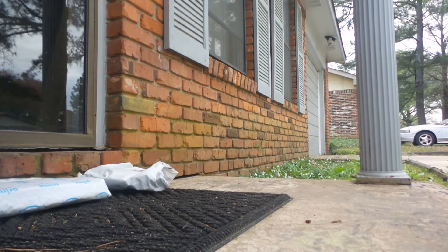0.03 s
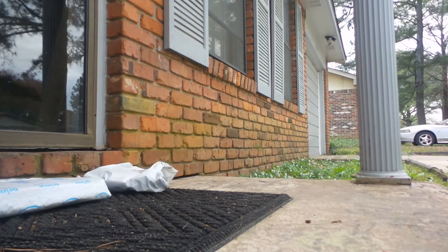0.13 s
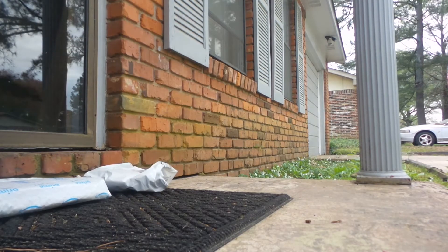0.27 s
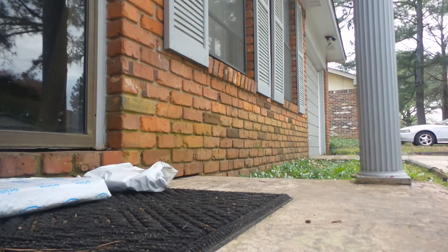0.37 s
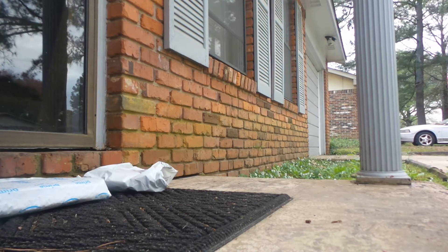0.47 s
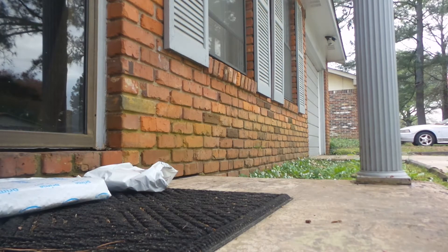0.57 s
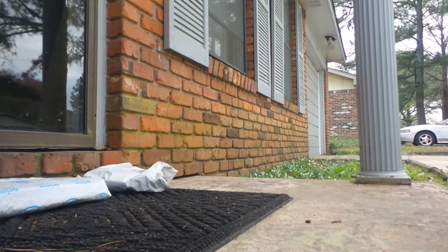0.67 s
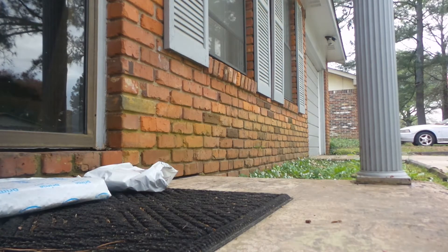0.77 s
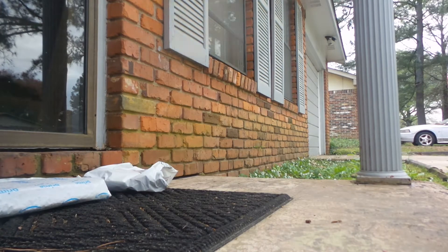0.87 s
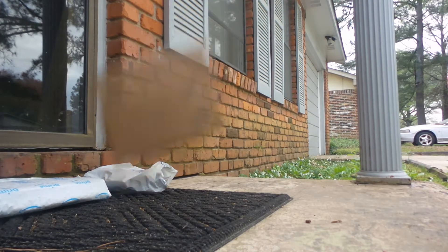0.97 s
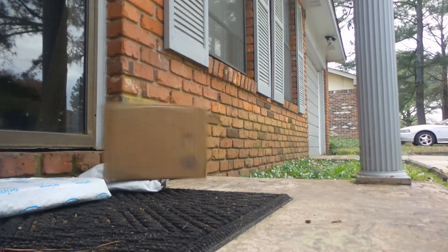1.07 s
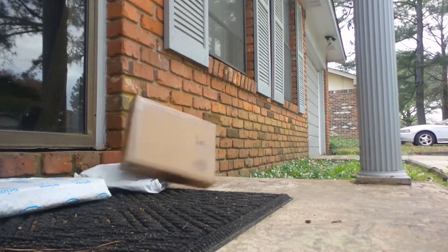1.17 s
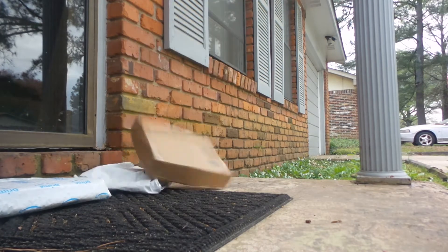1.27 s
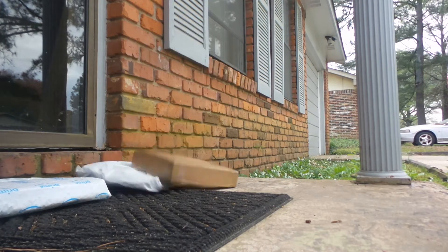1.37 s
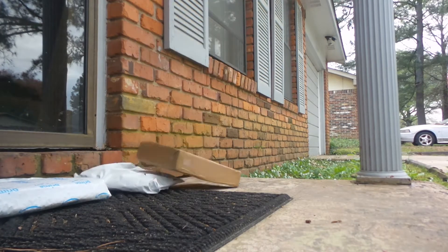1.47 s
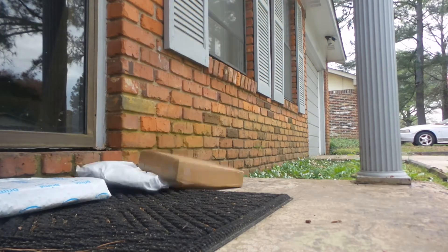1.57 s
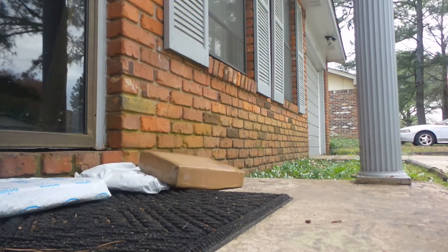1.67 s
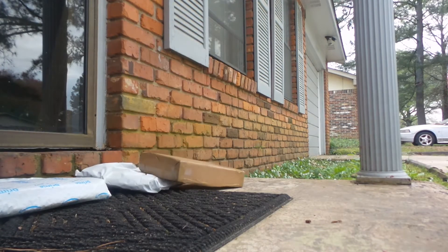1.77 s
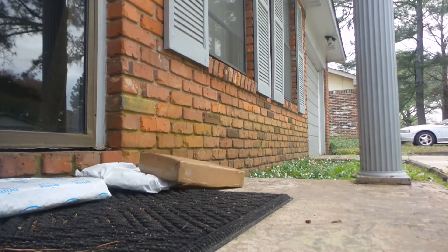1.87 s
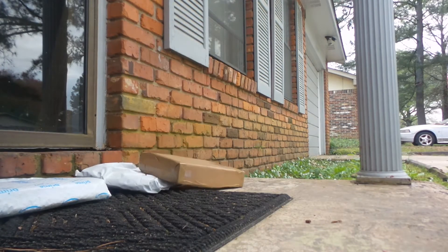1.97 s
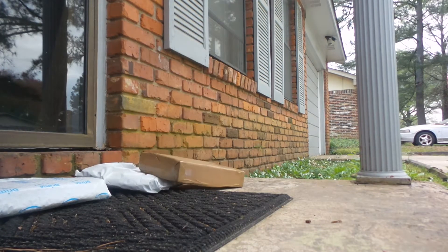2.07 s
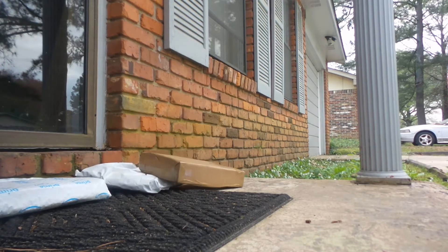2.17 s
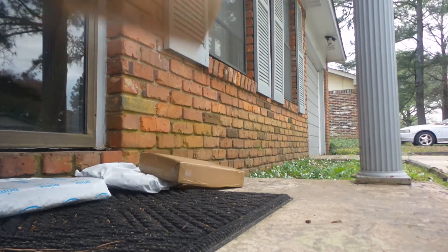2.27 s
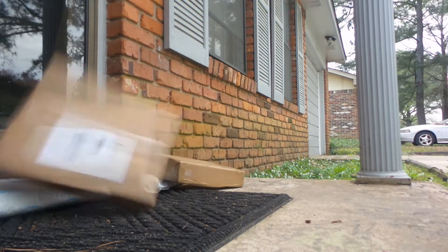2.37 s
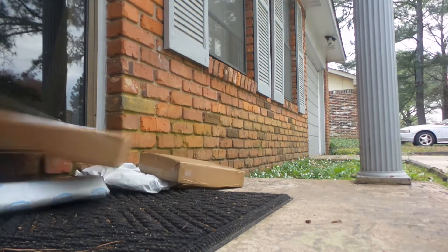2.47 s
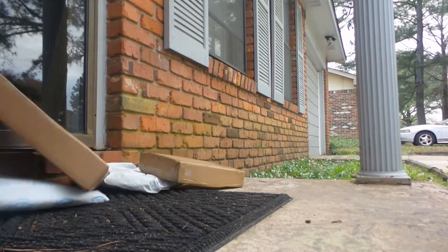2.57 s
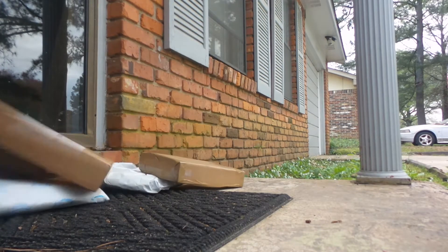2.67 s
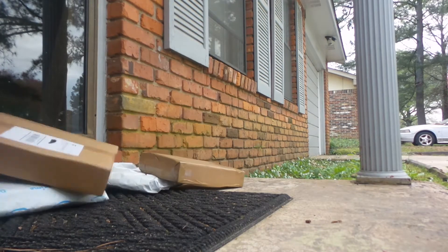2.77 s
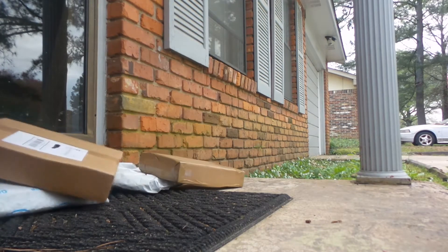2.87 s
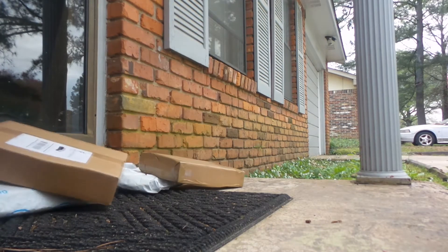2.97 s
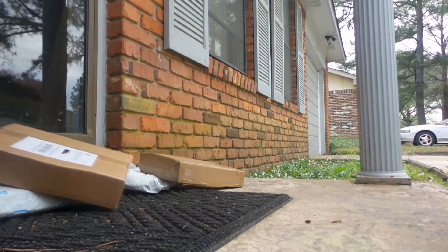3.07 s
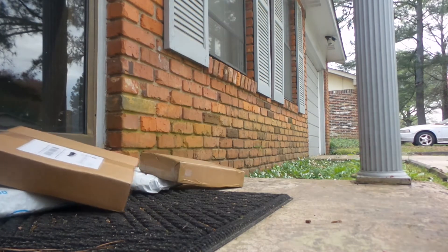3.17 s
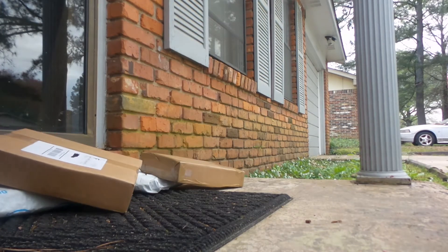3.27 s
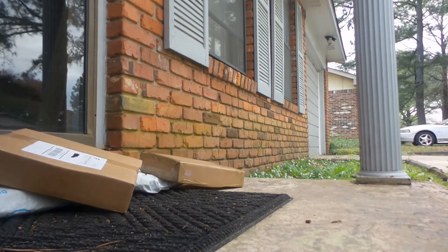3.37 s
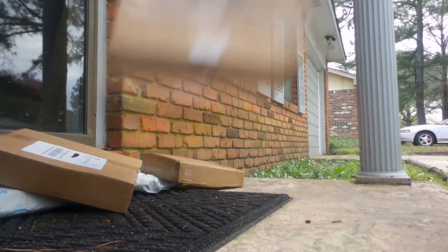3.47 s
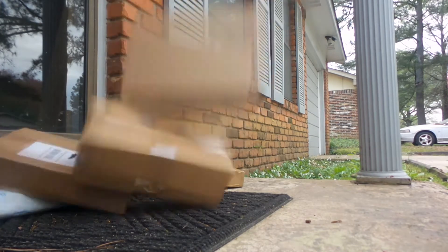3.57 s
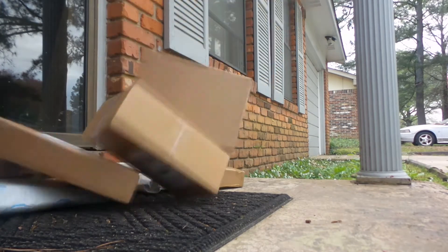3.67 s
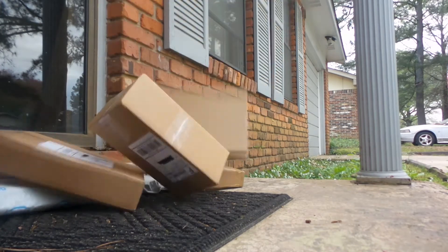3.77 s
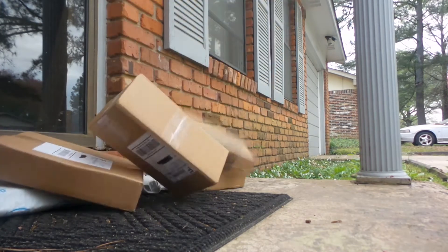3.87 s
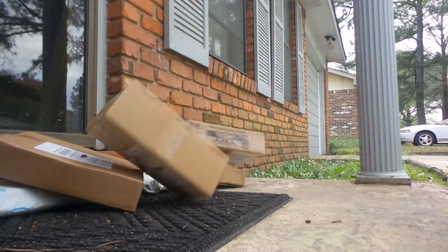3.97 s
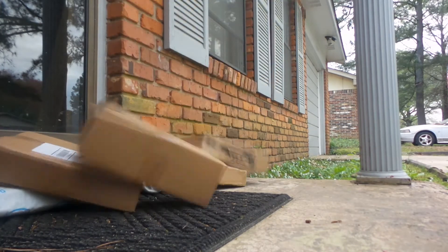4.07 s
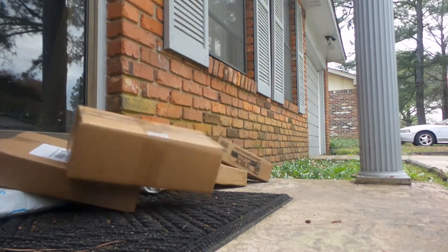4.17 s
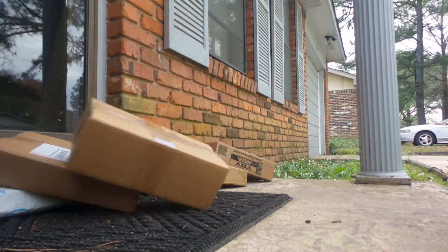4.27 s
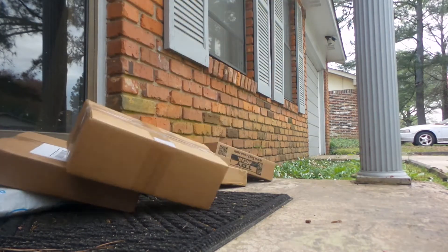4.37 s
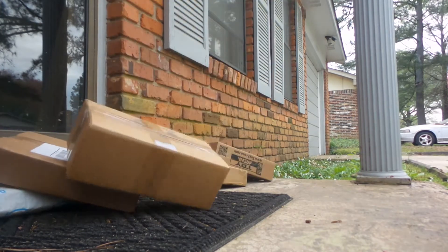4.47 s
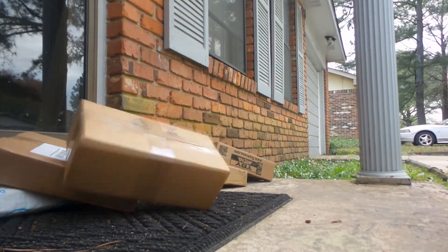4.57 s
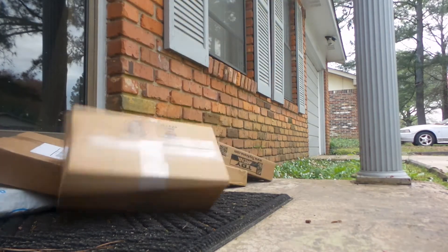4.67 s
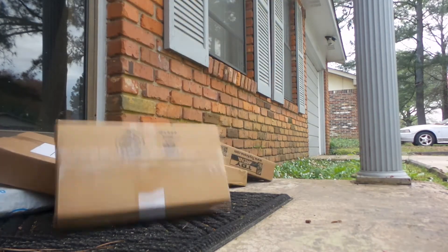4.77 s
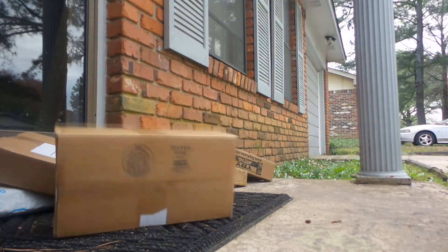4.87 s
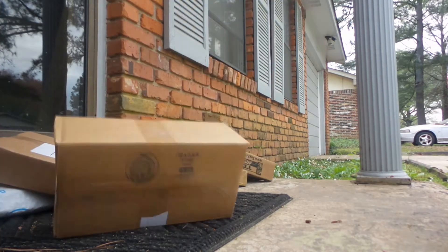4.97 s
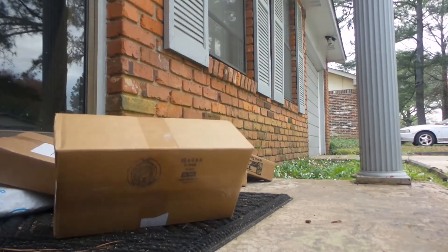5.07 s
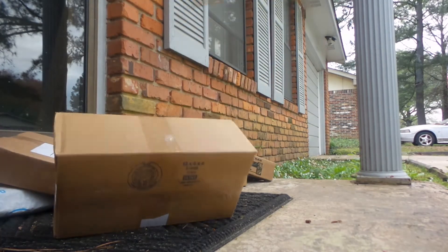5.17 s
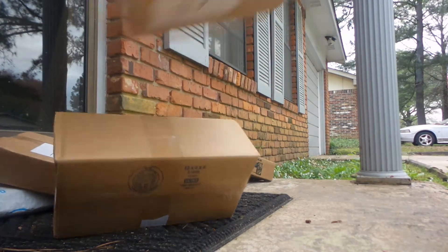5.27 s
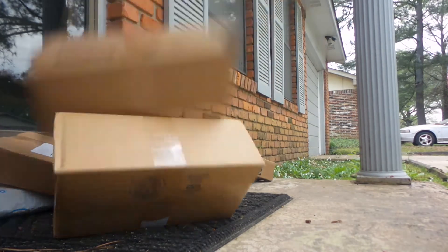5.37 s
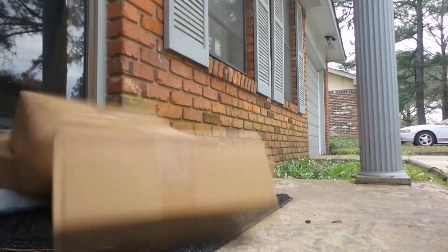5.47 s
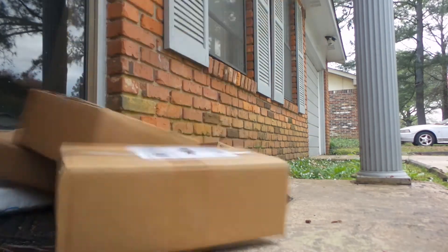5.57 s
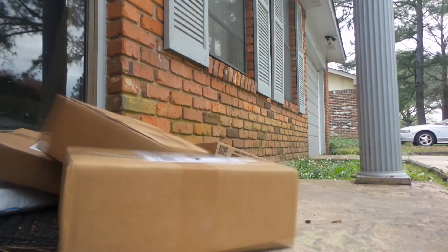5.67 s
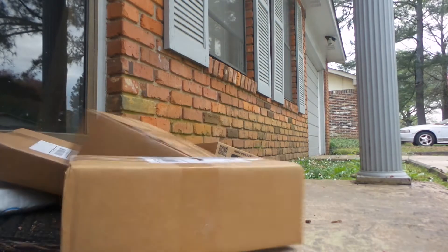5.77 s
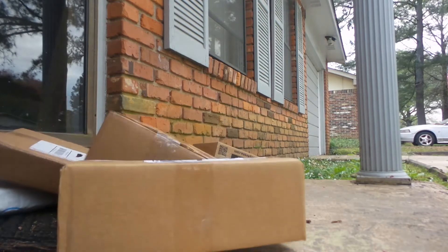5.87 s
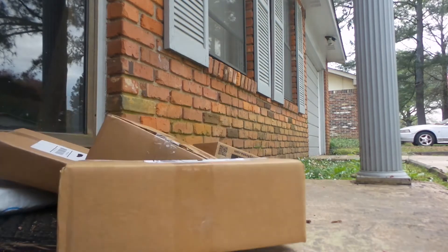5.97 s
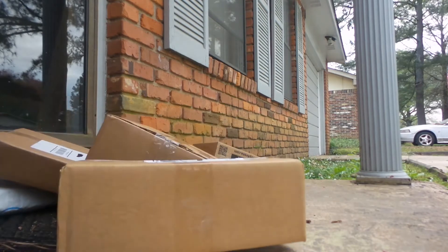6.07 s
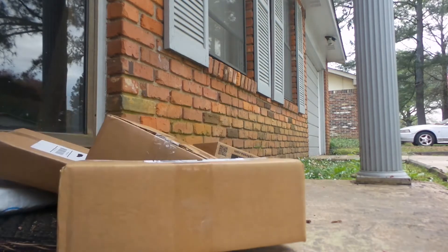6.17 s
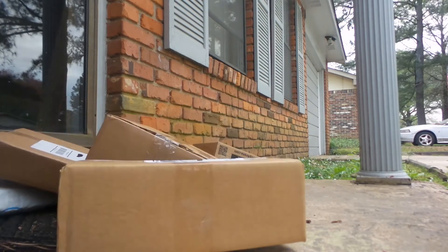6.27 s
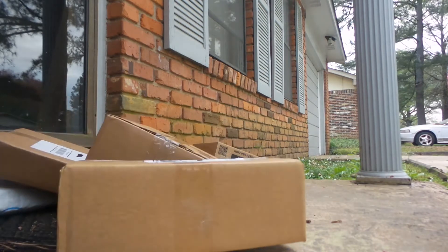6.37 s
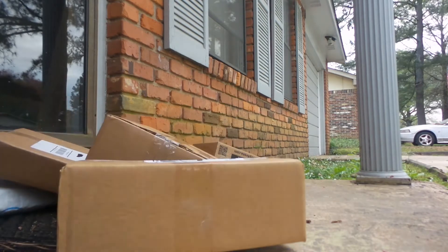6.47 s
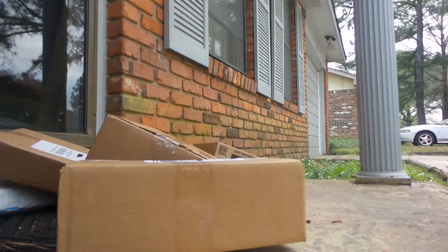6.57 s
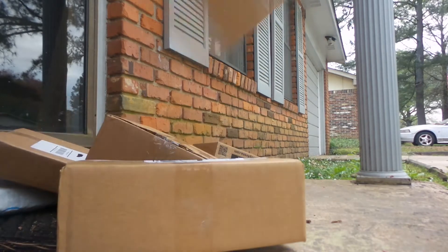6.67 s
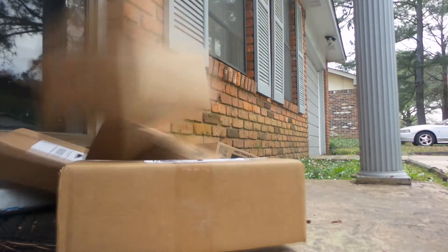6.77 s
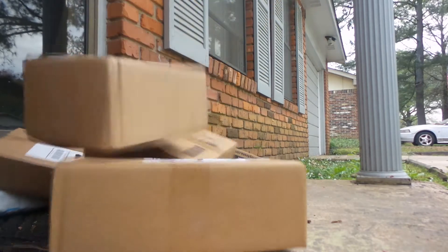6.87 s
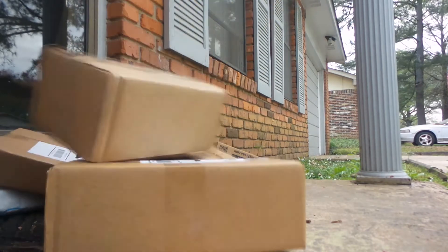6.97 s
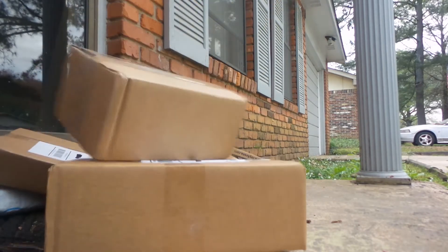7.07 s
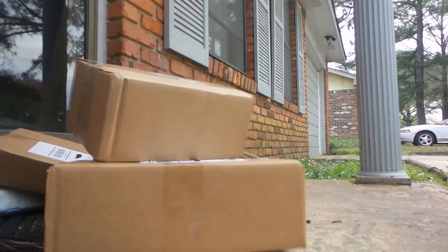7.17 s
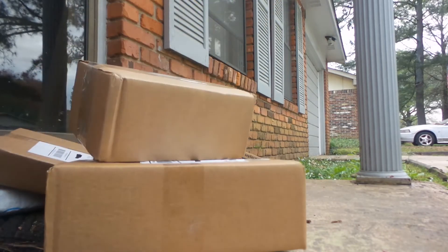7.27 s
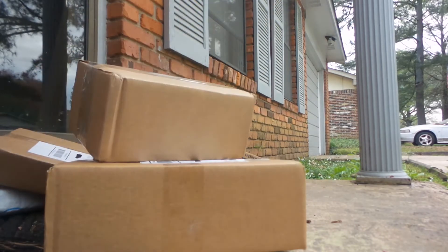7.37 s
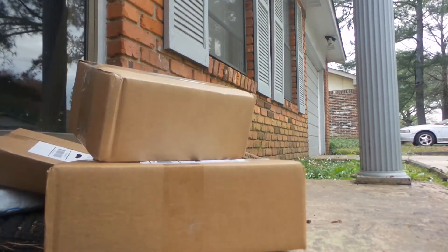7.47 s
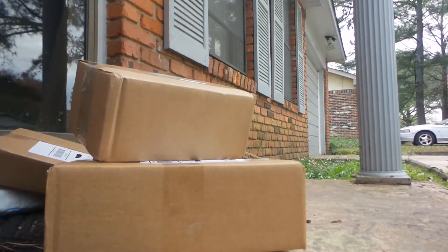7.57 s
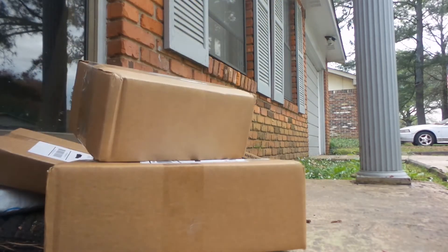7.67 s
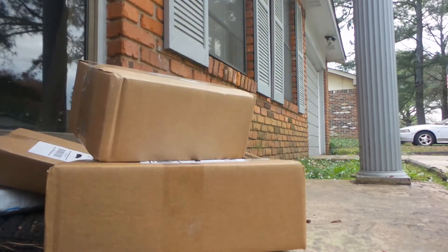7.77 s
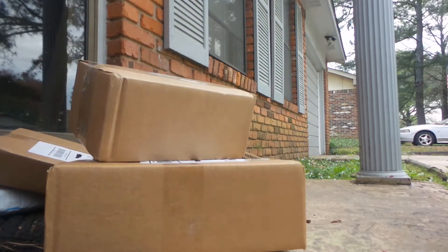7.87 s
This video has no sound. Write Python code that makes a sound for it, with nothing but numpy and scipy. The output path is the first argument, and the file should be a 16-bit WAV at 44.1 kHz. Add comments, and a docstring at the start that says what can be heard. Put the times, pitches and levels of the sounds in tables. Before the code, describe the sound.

Cardboard boxes are tossed one after another onto a porch close to the microphone, thudding, bouncing, scuffing and snapping tape over a low outdoor hum.

```python
"""Boxes tossed onto a porch

Five cardboard boxes are tossed one after another onto a concrete porch, close to the microphone.
Each blow is a force pulse with bursts of buckling board, filtered by the resonances of the box;
tape snaps as noise bursts, and sliding board and plastic are coloured random clicks.
Brick walls echo, small birds whistle as gliding sines, and filtered noise makes a low background hum."""
import sys
import numpy as np
from scipy import signal
from scipy.fft import rfft, irfft, next_fast_len
from scipy.io import wavfile

SR = 44100
rng = np.random.default_rng(int(sys.argv[2]) if len(sys.argv) > 2 else 0)


def waveform_to_disk(signal):
    """Save audio, clipped to [-1, 1], as 16-bit WAV at the path in sys.argv[1]."""
    frames = np.transpose(np.atleast_2d(signal))
    scaled = np.clip(frames, -1, 1) * 32767
    samples = np.round(scaled).astype(np.int16)
    wavfile.write(sys.argv[1], SR, samples)


N = 349272
TIME = np.arange(N) / SR  # seconds
AGE = np.arange(SR // 3) / SR  # seconds since a blow

# Moments at which the boxes are let go. Each entry: time in seconds.
RELEASE_TIMES = [0, 2.35, 3.5, 5.3, 6.7]
# Panel and air resonances of the five boxes. Each row: frequency in Hz, width in Hz, relative level in dB.
FLAT_BOX_MODES = [(109, 26, -18), (188, 160, -7.5), (295, 41, 1), (440, 80, 11.5), (515, 450, -5),
                  (662, 83, -1), (870, 180, -12), (846, 24, 10), (960, 96, -25), (1100, 310, -2),
                  (1052, 210, -30), (1230, 42, -20), (1630, 190, -9)]
LONG_BOX_MODES = [(115, 60, -11.5), (248, 26, -4), (360, 42, -4.5), (460, 49, -24), (640, 32, -60.5),
                  (820, 180, -10.5), (1050, 73, -18), (1240, 230, -56), (1430, 39, -49)]
TAPED_BOX_MODES = [(205, 130, -16), (280, 30, -6), (350, 83, -10), (430, 23, -0.5), (490, 11, -1.5),
                   (534, 38, -6), (590, 48, -20), (654, 170, -3), (755, 20, -33), (820, 170, -62),
                   (896, 24, -38.5), (1140, 70, -32), (1141, 27, -38)]
WIDE_BOX_MODES = [(191, 94, 0), (270, 73, 7), (386, 50, 4), (520, 32, -2), (560, 27, -14), (716, 32, -35),
                  (766, 26, -39), (870, 21, -30), (1010, 53, -44), (1160, 73, -39), (1130, 56, -39),
                  (1260, 45, -32), (1300, 55, -38)]
TOP_BOX_MODES = [(117, 160, 1), (235, 77, -3), (307, 85, -7), (420, 106, 4), (544, 83, -17), (630, 44, -25),
                 (670, 57, -5), (770, 44, -18), (892, 70, -40), (1014, 38, -31), (1060, 55, -40),
                 (1330, 78, -38), (1340, 48, -43)]
# How the board of each box, in order of release, takes a blow. Each row: mean narrow face pitch in Hz,
# t60 of the first blow in seconds, t60 of later blows in seconds,
# rasp level above the crack in dB for a blow of no hardness.
BOARDS = [(577, 0.078, .1, -0.5), (470, 0.058, 0.092, 0), (385, 0.15, 0.13, -0.5), (378, 0.062, 0.15, 3.5),
          (405, 0.042, .11, 0.5)]
# Landings, bounces and knocks. Each row: time in seconds, broad face pitch in Hz, thump level in dB,
# knock level in dB, crack level in dB, hardness from 0 to 1.
BLOWS = [(.006, 140, -46, -32.5, -48, 0.1), (.305, 136, -45, -41, -64, 0.1),
         (1.041, 288, -27, -23.5, -25.5, 0.06), (1.052, 275, -19, -17.5, -22, 0.13),
         (1.07, 210, -15, -20, -24, 0.19), (1.179, 291, -21, -25, -35, 0.17),
         (1.291, 178, -37, -24.5, -32, 0.15), (1.382, 260, -26, -24, -23, 0.1),
         (1.394, 276, -20.5, -17, -27.5, .06), (1.42, 178, -26.5, -21.5, -32, 0.46),
         (1.508, 191, -34, -45, -64, 0.23), (1.578, 172, -26.5, -23, -35.5, 0.36),
         (1.708, 130, -43, -32.5, -69, 0.14), (2.024, 162, -35, -44.5, -43.5, 0.56),
         (2.091, 230, -32.5, -44, -57, .1), (2.274, 163, -17.5, -22.5, -37, 0.13),
         (2.334, 166, -27, -35, -44, 0.43), (2.416, 250, -15, -10, -27, 0.32),
         (2.44, 234, -17, -19.5, -29, 0), (2.484, 187, -14.5, -13.5, -28.5, 0.07),
         (2.574, 286, -36, -30, -35, 0), (2.639, 300, -20, -27, -39.5, 0.55),
         (2.78, 264, -26, -31.5, -46.5, 0.43), (2.864, 134, -31.5, -40.5, -53, 0.35),
         (2.902, 210, -41, -45, -53, 0.64), (3.604, 214, -13.5, -15.5, -29, 0.36),
         (3.62, 213, -12.5, -18, -35, 0.62), (3.637, 200, -9, -16, -30, 0.1),
         (3.651, 210, -18, -16, -36, 0.25), (3.672, 258, -14, -19, -29, 0.23),
         (3.824, 129, -19, -26, -39, 0.14), (3.879, 127, -21, -26, -36.5, 0.4),
         (3.914, 173, -20, -21.5, -37, 0.47), (3.979, 272, -20, -28.5, -38.5, 0.26),
         (3.996, 180, -21.5, -29.5, -63, 0.07), (4.123, 165, -28, -31, -41, 0.29),
         (4.141, 126, -18, -22, -33, 0.31), (4.183, 280, -18.5, -28.5, -37, 0.14),
         (4.26, 128, -34, -48, -44, 0.58), (4.73, 163, -20.5, -30.5, -45, 0.3),
         (4.779, 229, -24, -28, -38.5, 0.23), (4.877, 112, -42, -32, -45.5, 0.5),
         (4.972, 160, -28.5, -32.5, -60, 0.35), (5.424, 300, -16.5, -15, -27, 0.76),
         (5.442, 197, -21, -20.5, -27.5, 0.42), (5.464, 192, -11, -14.5, -31.5, 0.4),
         (5.492, 230, -10.5, -14, -33, 0.45), (5.523, 180, -10.5, -15, -33, 0.34),
         (5.551, 165, -13.5, -19.5, -37.5, 0.03), (5.651, 181, -20.5, -34, -45.5, 0.42),
         (5.773, 174, -24, -29, -42, 0.4), (5.852, 188, -24, -36, -39.5, 0.43),
         (6.09, 177, -48, -46.5, -82, 0.5), (6.816, 214, -10.5, -16.5, -23.5, 0.18),
         (6.826, 192, -18, -20, -27.5, 0.33), (6.865, 240, -9, -14.5, -32, 0.42),
         (6.92, 165, -18, -26.5, -36, 0.18), (6.978, 233, -15, -24.5, -36.5, 0.12),
         (7.026, 113.6, -17, -36, -32.5, 0.3), (7.084, 170, -25, -30, -40, 0.38),
         (7.172, 189, -36.5, -49, -56, 0.27), (7.226, 236, -34, -42, -70, 0.3),
         (7.48, 108, -39, -36.5, -44, 0.36), (7.578, 238, -25.5, -25.5, -37.5, .45)]
# Tape, folds and plastic snapping. Each row: time in seconds, peak level in dB, pitch in Hz.
SNAPS = [(2.216, -27.5, 9250), (3.652, -13, 2560), (3.9142, -12, 1300), (3.9808, -21.5, 4230),
         (4.1487, -12.5, 2530), (5.4242, -17, 3120), (5.4465, -15, 4500), (5.4929, -10, 1700),
         (5.5044, -11, 2230), (6.8152, -11, 3160), (6.9745, -21, 13000), (7.271, -27, 13200),
         (7.2887, -24.5, 11000), (7.3234, -35.5, 4030), (7.3577, -23.5, 12400), (7.4755, -27, 6300),
         (7.5806, -20.5, 2440), (7.802, -20.5, 12400), (7.807, -23.5, 6400)]
# Boxes sliding over mat, concrete and mailers, or being picked up. Each row: start in seconds,
# time until release in seconds, scuff level in dB, rustle level in dB.
SLIDES = [(-.05, .1, -35.5, -40), (0.267, 0.092, -48.5, -69), (1.058, 0.16, -40, -46),
          (1.301, 0.28, -38, -48), (1.64, 0.2, -47, -54), (2.04, 0.13, -49, -52),
          (2.268, 0.096, -43, -40.5), (2.572, 0.24, -44.5, -45.5), (2.86, 0.19, -56.5, -59.5),
          (3.003, 0.24, -53, -70), (3.75, 0.61, -43, -52), (4.365, 0.18, -54, -58),
          (4.587, 0.51, -47.5, -46), (5.19, 0.3, -54.5, -64), (5.583, .26, -60, -44), (5.9, 0.27, -59, -58),
          (6.888, 0.31, -46.5, -47.5), (7.212, 0.13, -50.5, -60), (7.414, 0.43, -44.5, -58)]
# Short swishes of plastic and tape. Each row: centre in seconds, half length in seconds, level in dB.
SWISHES = [(0.382, 0.044, -52), (.495, .012, -54), (.613, 0.024, -53), (1.2, 0.02, -29), (1.36, 0.017, -37),
           (1.406, 0.024, -25), (1.488, 0.013, -36), (1.68, 0.014, -34), (1.875, 0.043, -32),
           (2.596, 0.016, -29.5), (3.164, 0.044, -45), (3.274, 0.017, -47.5), (3.946, 0.012, -33.5),
           (6.438, 0.026, -43)]
# Ringing of the board when an edge catches. Each row: frequency in Hz, width in Hz.
CATCH_MODES = [(420, 65), (760, 110), (1150, 130)]
# Bird whistles. Each row: start in seconds, end in seconds, first and last frequency in Hz,
# level in dB relative to the song gain.
BIRDS = [(0.599, 0.801, 6460, 6800, -62), (0.664, 0.805, 3200, 3480, -69), (0.792, 1.02, 3383, 3324, -53),
         (0.925, 1.006, 1905, 1870, -60), (0.997, 1.045, 3230, 3130, -64), (3.27, 3.412, 13500, 12900, -65),
         (3.522, 3.626, 6760, 6240, -58.5), (4.48, 4.604, 9100, 7600, -52), (5.132, 5.346, 4320, 4180, -66),
         (5.324, 5.41, 3530, 3400, -53), (7.666, 7.695, 4700, 4380, -48.5)]
# Spectra of cracking liner, rubbing board, scuffing board, crinkling plastic, low hum and steady wash.
# Each row: frequency in Hz, relative level in dB per Hz.
CRACK_SPECTRUM = [(700, 6), (1400, -6.5), (2200, -6.5), (3300, -5.5), (5000, -11), (8000, -38)]
RASP_SPECTRUM = [(2500, -39), (5000, 1.5), (8000, 2), (11000, 1.5), (13500, 4), (16000, -9)]
SCUFF_SPECTRUM = [(150, -2.5), (400, 7), (800, 5.5), (1300, 0.5), (3000, -5), (6000, -10)]
RUSTLE_SPECTRUM = [(1500, 2), (4000, 1.5), (7000, 3), (10000, 4.5), (13000, 8.5), (16000, -9.5)]
HUM_SPECTRUM = [(20, -14), (45, -1.5), (80, 7), (140, 10.5), (220, 3.5), (400, -4), (800, -17), (1600, -17),
                (3200, -22.5), (6500, -31), (13000, -28), (16000, -33)]
WASH_SPECTRUM = [(150, -4), (400, 2.5), (1000, 0), (3000, -10.5), (7000, -16.5), (16000, -21)]
# Level of the low background hum. Each row: time in seconds, level in dB.
HUM_LEVEL = [(0, -40), (.6, -51), (1, -44), (2, -39), (2.8, -45), (3.1, -53.5), (3.5, -49), (4.4, -43),
             (5.2, -40.5), (5.9, -43), (6.25, -52.5), (6.6, -45.5), (7.3, -42.5), (7.92, -40.5)]
# First echoes from door, brick wall and porch roof. Each row: delay in seconds, level in dB.
WALL_ECHOES = [(.0047, -17), (.0092, -19.5), (0.0144, -15.5)]
# Decay of the porch. Each row: frequency in Hz, t60 in seconds.
PORCH_DECAY = [(100, 0.27), (400, 0.58), (1500, 0.42), (5000, 0.7), (16000, 0.14)]
# Spectrum of the faint side signal. Each row: frequency in Hz, side level relative to mid in dB.
SIDE_SPECTRUM = [(30, -10), (100, -69), (400, -64.5), (1000, -52), (3000, -39.5), (14000, -34.5)]

FACE_SCATTER_OCTAVES = 0.063  # the narrow face rings a little differently wherever it is struck
NARROW_FACE_DB, HARD_RING_DB = -9.5, 17  # ring against the box modes; gain per unit of hardness
HARD_RASP_LOSS_DB = 6.5  # rubbing lost per unit of hardness
SLIDE_ATTACK_S, SLIDE_T60_S = 0.055, 0.31
CATCHES_PER_S, CATCH_DB = 30, -8  # mean rate; level against the scuffing
WASH_DB = -59.5
MIC_LOW_HZ, CUTOFF_HZ = 40.5, 15800


def boxes():
    """Repeated impact: each blow excites the modes of the box released last, and soft blows rub more."""
    bodies = [FLAT_BOX_MODES, LONG_BOX_MODES, TAPED_BOX_MODES, WIDE_BOX_MODES, TOP_BOX_MODES]
    out, previous = np.zeros(N), None
    for s, broad_hz, thump_db, knock_db, crack_db, hardness in BLOWS:
        box = np.searchsorted(RELEASE_TIMES[1:], s)
        mean_narrow_hz, first_t60, later_t60, rasp_above_crack_db = BOARDS[box]
        narrow_hz = mean_narrow_hz * 2 ** (FACE_SCATTER_OCTAVES * rng.uniform(-0.98, 1))
        rasp_db = crack_db + rasp_above_crack_db - HARD_RASP_LOSS_DB * hardness
        # the first blow of each box has its own decay time
        t60 = later_t60 if box == previous else first_t60
        add(out, s, blow(bodies[box], broad_hz, narrow_hz, thump_db, knock_db, crack_db, rasp_db,
                         hardness, t60))
        previous = box
    return out


def blow(modes, broad_hz, narrow_hz, thump_db, knock_db, crack_db, rasp_db, hardness, t60,
         soft_rise=0.008, contact_t60=0.0105, give=0.003):
    """Contact force: a hard corner cracks at once, a soft landing crushes longer; both shake the panels."""
    hardness = np.clip(hardness, .01, .9)
    softness = 1 - hardness
    # rise and give, in seconds, both shorten as the blow hardens
    crush = (1 - np.exp(-AGE / (soft_rise * softness))) * from_db(-60 * AGE / max(t60, .01))
    touch = from_db(-60 * AGE / contact_t60)
    pressure = np.sqrt(hardness * at_level(touch, 0) ** 2 + softness * at_level(crush, 0) ** 2)

    # the board gives before the whole box is pushed; its flutes buckle one by one
    push = at_level(signal.unit_impulse(len(AGE), int(SR * give * softness)), 0)
    buckling = softness * at_level(crush * grains(len(AGE), 1500, 4.26), 0)
    sway = panels(push + 1.19 * buckling, modes, broad_hz, face_db=-5.5, face_width=35.3)
    thump = walls(band(sway, 80, 340))

    slap = at_level(touch * grains(len(AGE), 6000, 3.9), 0)
    narrow_face_db = NARROW_FACE_DB + HARD_RING_DB * hardness
    rattle_force = np.sqrt(hardness) * slap + 1.6 * buckling
    rattle = panels(rattle_force, modes, narrow_hz, face_db=narrow_face_db, face_width=90.0)
    knock = walls(band(rattle + 0.26 * buckling + 0.24 * hardness * slap, 254, 1306))

    # paper liner and tape crackle for as long as the pressure lasts
    crackle = pressure * grains(len(AGE), 3000, 5.1)
    crack = ground(colour(liner(crackle), CRACK_SPECTRUM))
    rubbing = pressure * grains(len(AGE), 7000, 1.65)
    rasp = ground(colour(rubbing, RASP_SPECTRUM))
    low = at_level(thump, thump_db) + at_level(knock, knock_db)
    return low + at_level(crack, crack_db) + at_level(rasp, rasp_db)


def panels(force, modes, face_hz, face_db, face_width, scatter_db=5.5):
    """Modal response: the struck face rings at its own pitch, with box modes of varying strength."""
    body = 0
    for hz, width, db in modes:
        body = body + from_db(db + scatter_db * rng.normal()) * resonate(force, hz, width)
    face = resonate(force, face_hz, face_width)
    return at_level(body, 0) + at_level(face, face_db)


def liner(force, count=10, ring_db=4.0):
    """Local resonance: stiff paper patches round the contact ring at other pitches on every blow."""
    pitches = 1400 * 2 ** rng.uniform(0, 2.2, count)
    ringing = sum(resonate(force, hz, width=320) for hz in pitches)
    return force + from_db(ring_db) * ringing


def walls(x, wall_cut_hz=200.0):
    """Early reflection: nearby walls return a dulled copy of a blow a few milliseconds later."""
    dull = signal.sosfilt(signal.butter(1, wall_cut_hz, fs=SR, output="sos"), x)
    echoes = sum(from_db(db) * np.interp(AGE - delay, AGE, dull, left=0) for delay, db in WALL_ECHOES)
    return x + echoes


def ground(x, bounce_db=-7.0, longest=.002):
    """Comb interference: concrete and nearby boxes return the treble after two random short delays."""
    bounces = 0
    for delay in longest * rng.uniform(.1, 1, 2):
        whole_delay = round(delay * SR) / SR  # whole samples keep the treble intact
        bounces = bounces + from_db(bounce_db) * np.interp(AGE - whole_delay, AGE, x, left=0)
    return x + bounces


def snaps(t60=0.0091, flutter_db=-8.5, flutter_t60=0.077):
    """Sudden release of tension: tape and plastic film snap as band noise, then flutter briefly."""
    out = np.zeros(N)
    fade = from_db(-60 * AGE / t60) + from_db(flutter_db - 60 * AGE / flutter_t60)
    for s, db, hz in SNAPS:
        snap = band(fade * rng.standard_normal(len(AGE)), hz * 0.67, hz * 1.28)
        add(out, s, from_db(db) * snap / np.abs(snap).max())
    return out


def sliding(clump_db=4.0):
    """Friction noise: board scuffs over mat and concrete; plastic crinkles in clumps and swishes."""
    scuffing, rustling = 0, 0
    for start, length, scuff_db, rustle_db in SLIDES:
        motion = slide(start, length)
        scuffing = scuffing + from_db(scuff_db) * motion
        rustling = rustling + from_db(rustle_db) * motion
    clumps = from_db(clump_db * drift(63))
    swishes = sum(from_db(db) * np.exp(-((TIME - s) / half) ** 2) for s, half, db in SWISHES)
    scuff = scuffing * clumps * rms_one(colour(grains(N, 3000, 1.2), SCUFF_SPECTRUM))
    rustle = (rustling * clumps + swishes) * rms_one(colour(grains(N, 7000, 3.8), RUSTLE_SPECTRUM))
    return scuff + rustle + scuffing * catches()


def slide(start, length):
    """Sliding friction: the motion gets going and holds, then friction makes it die away."""
    rise = np.clip((TIME - start) / SLIDE_ATTACK_S, 0, 1)
    return rise * from_db(-60 * np.clip(TIME - start - length, 0, 1) / SLIDE_T60_S)


def catches(edge_db=-10.0):
    """Stick and slip: a catching edge makes sparse small ticks, each ringing the board briefly."""
    ticks = grains(N, CATCHES_PER_S, 0.83)
    ringing = sum(resonate(ticks, hz, width) for hz, width in CATCH_MODES)
    edge = from_db(edge_db) * colour(ticks, CRACK_SPECTRUM)
    return from_db(CATCH_DB) * rms_one(ringing + edge)


def birds(waver=0.0094):
    """Frequency modulation: nearly pure whistles swell, glide, waver and fade."""
    out = np.zeros(N)
    for start, end, start_hz, end_hz, db in BIRDS:
        progress = np.clip((TIME - start) / (end - start), 0, 1)
        glide_hz = start_hz + (end_hz - start_hz) * progress
        hz = glide_hz * (1 + waver * drift(510))
        level = from_db(db + 0.6 * drift(50)) * np.sin(np.pi * progress)
        out += level * np.sin(2 * np.pi * np.cumsum(hz) / SR)
    return out


def porch(x, wet_db, build_up=0.013):
    """Reverberation: scattered echoes from brick, roof and floor, as octave bands with their own decay."""
    response = 0
    for low in 60 * 2 ** np.arange(9.0):
        noise = band(rng.standard_normal(len(AGE)), low, 2 * low)
        response = response + noise * from_db(-60 * AGE / at_hz(PORCH_DECAY, low * np.sqrt(2)))
    response = response * (1 - np.exp(-AGE / build_up))
    return from_db(wet_db) * signal.fftconvolve(x, response / np.linalg.norm(response))[:N]


def background():
    """Filtered noise: a low hum with a thin hiss, its level changing over time, over a steady wash."""
    hum_s, hum_db = np.transpose(HUM_LEVEL)
    hum = rms_one(colour(rng.standard_normal(N), HUM_SPECTRUM))
    wash = rms_one(colour(rng.standard_normal(N), WASH_SPECTRUM))
    return from_db(np.interp(TIME, hum_s, hum_db)) * hum + from_db(WASH_DB) * wash


def two_channels(x, smear_t60=0.031):
    """Mid and side: nearly mono; a faint noise-smeared side is added left and subtracted right."""
    smear = rng.standard_normal(len(AGE)) * from_db(-60 * AGE / smear_t60)
    side = colour(signal.fftconvolve(x, smear / np.linalg.norm(smear))[:N], SIDE_SPECTRUM)
    return np.array([x + side, x - side])


def from_db(db):
    """Logarithmic level: decibels to amplitude gain."""
    return 10 ** (np.asarray(db) / 20)


def rms_one(x):
    """Effective value: scale to rms 1."""
    return x / np.sqrt(np.mean(x ** 2) + 1e-20)


def at_level(x, db, span=0.025):
    """Energy level: scale a blow so that its energy, spread over span seconds, has this level."""
    return from_db(db) * x * np.sqrt(span * SR / (np.sum(x ** 2) + 1e-20))


def at_hz(points, hz):
    """Logarithmic pitch: read a table on a log-frequency axis."""
    table_hz, values = np.transpose(points)
    return np.interp(np.log(hz + 1e-9), np.log(table_hz), values)


def colour(x, spectrum):
    """Minimum phase: a causal filter built from the given spectrum through its cepstrum."""
    size = next_fast_len(len(x) // 2 + 2048) * 2
    cepstrum = irfft(np.log(from_db(at_hz(spectrum, np.fft.rfftfreq(size, 1 / SR)))))
    # folding the cepstrum onto positive time makes the filter causal
    cepstrum[1:size // 2] *= 2
    cepstrum[size // 2 + 1:] = 0
    return irfft(rfft(x, size) * np.exp(rfft(cepstrum)))[:len(x)]


def band(x, low_hz, high_hz):
    """Band limitation: a Butterworth band-pass."""
    edges = [low_hz, min(high_hz, SR / 2 - 1000)]
    return signal.sosfilt(signal.butter(2, edges, "band", fs=SR, output="sos"), x)


def resonate(x, hz, width):
    """Damped oscillator: one resonance with a peak gain of about 1."""
    r = np.exp(-np.pi * width / SR)
    feedforward = np.array([1, 0, -1]) * (1 - r * r) / 2
    feedback = [1, -2 * r * np.cos(2 * np.pi * hz / SR), r * r]
    return signal.lfilter(feedforward, feedback, x + 1e-18)


def grains(size, per_s, spread_db):
    """Random impulses: fibres and folds give way as clicks of uneven strength, rms 1."""
    strength = from_db(spread_db * np.minimum(rng.exponential(1, size), 4))
    happens = rng.random(size) < per_s / SR
    return rms_one(happens * strength * rng.choice([-1, 1], size))


def drift(rate):
    """Random modulation: straight lines join normal draws of spread 1, rate draws per second."""
    knots = rng.standard_normal(4096)
    return np.interp(TIME * rate, np.arange(len(knots)), knots)


def add(out, s, x):
    """Superposition: mix a sound in at a time in seconds."""
    i = max(int(s * SR), 0)
    out[i:i + len(x)] += x[:N - i]


def scene():
    """Superposition of sources: boxes close by, the porch around them, far birds and a background hum."""
    near = boxes() + snaps() + sliding()
    song = birds()
    # distant birds arrive partly as echo
    far = from_db(5) * song + porch(song, wet_db=-3.0) + background()
    return two_channels(near + porch(near, wet_db=-18.5) + far)


def record(dry):
    """Limited response: the microphone loses deep bass, loud peaks are rounded off, the top is cut."""
    heard = signal.sosfilt(signal.butter(2, MIC_LOW_HZ, "high", fs=SR, output="sos"), dry)
    knee, headroom = .7, .25
    over = np.maximum(np.abs(heard) - knee, 0)
    rounded = np.clip(heard, -knee, knee) + np.sign(heard) * headroom * np.tanh(over / headroom)
    return signal.sosfilt(signal.ellip(10, .1, 80, CUTOFF_HZ, fs=SR, output="sos"), rounded)


dry = scene()
out = record(dry)
waveform_to_disk(out)
```